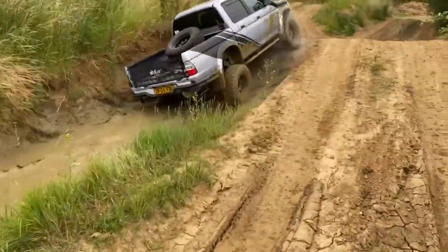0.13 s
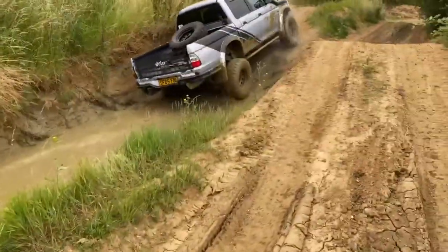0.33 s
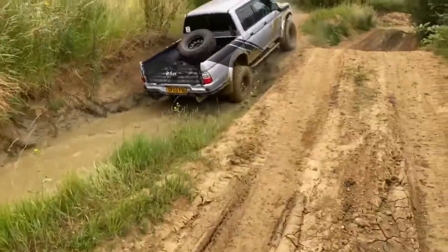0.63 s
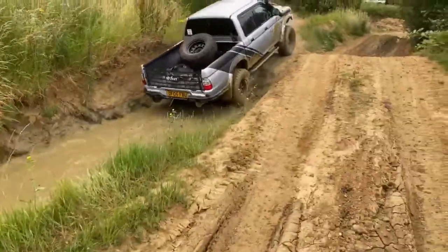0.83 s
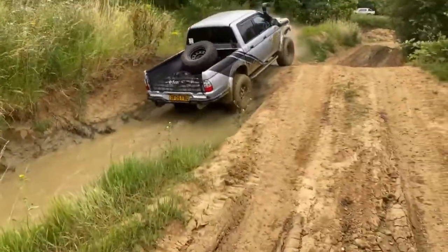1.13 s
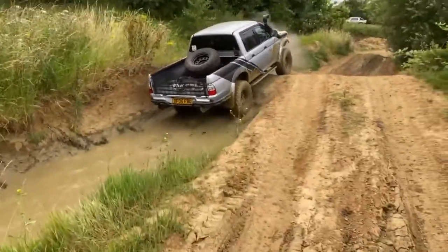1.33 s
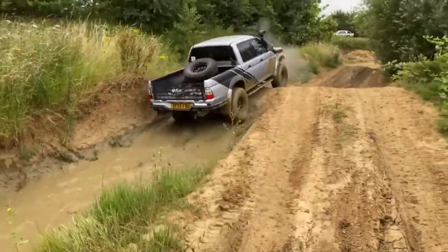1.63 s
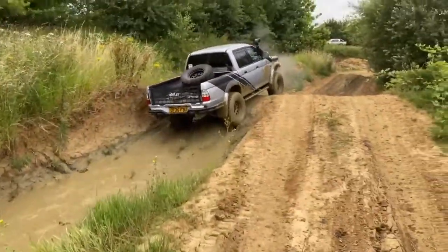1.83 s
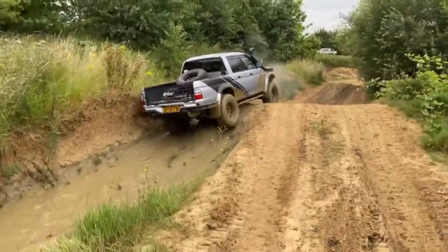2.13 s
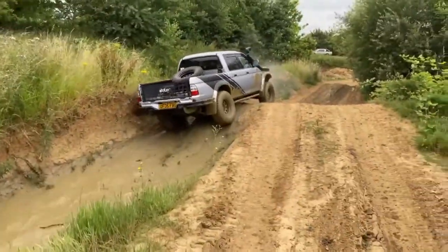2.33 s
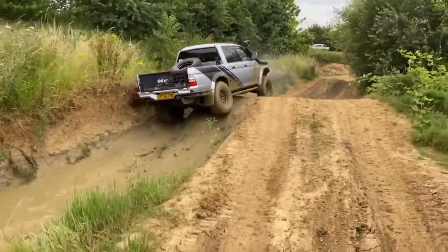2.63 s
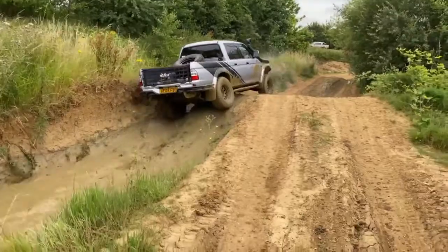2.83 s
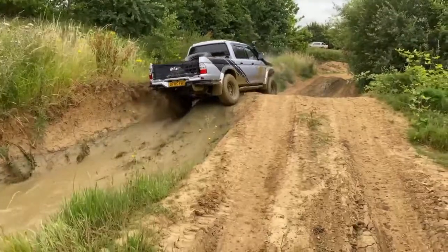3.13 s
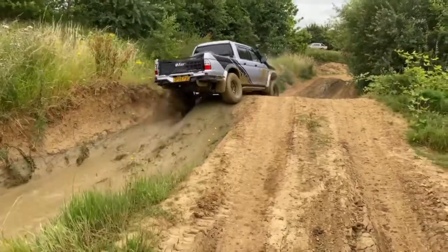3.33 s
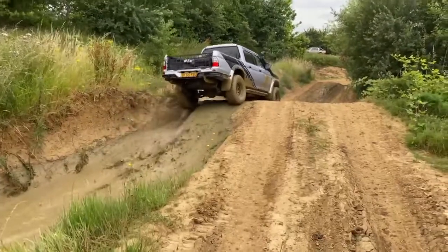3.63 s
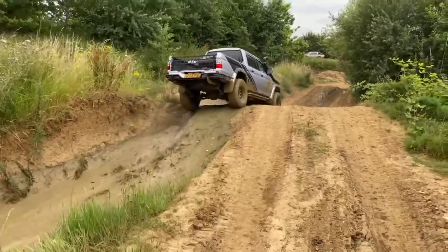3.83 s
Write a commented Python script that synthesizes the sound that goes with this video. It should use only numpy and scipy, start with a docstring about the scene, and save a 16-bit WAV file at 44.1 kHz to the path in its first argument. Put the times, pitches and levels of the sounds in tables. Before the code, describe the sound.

A hard-working truck engine growls and burbles while tyres hiss and slap through wet mud

```python
"""A hard-working eight-cylinder engine is heard first: a pickup truck claws its way out of a muddy ditch,
revving, bogging down and pulling again. Sines locked to the engine cycle give the firing hum and the burble
of the two uneven cylinder banks; firing impulses ring pipe resonances to give the exhaust bark.
Tyres hiss and slap through mud and water as bands and short bursts of noise, the engine bay whirrs in
resonated noise, and gusts buffet the microphone ports as low noise, rasp and sharp filtered impulses."""
import sys
import numpy as np
from scipy import signal
from scipy.fft import rfft, irfft
from scipy.io import wavfile
from scipy.ndimage import uniform_filter1d

SR = 44100
rng = np.random.default_rng(int(sys.argv[2]) if len(sys.argv) > 2 else 0)


def dump_mix(stems):
    """Bounce the given channels to the path in sys.argv[1] as a 16-bit WAV at rate SR."""
    frames = np.atleast_2d(stems).T  # one column per channel
    limited = np.clip(frames, -1, 1)  # hard clip at full scale
    pcm = np.round(limited * 32767).astype(np.int16)
    wavfile.write(sys.argv[1], SR, pcm)


N = 176400  # samples, 4 s


def amp(db):
    """Logarithmic level: 20 dB is a factor of ten in amplitude."""
    return 10 ** (np.asarray(db) / 20)


def rms_one(x):
    """Power normalisation: scale to unit rms."""
    return x / np.sqrt(np.mean(x ** 2) + 1e-20)


def evened(x):
    """Envelope division: divide by the running rms over a quarter second."""
    return x / np.sqrt(uniform_filter1d(x ** 2, size=SR // 4) + 1e-12)


def in_time(rows):
    """Linear interpolation in time: each column of a curve table, one value per sample."""
    seconds, *columns = np.transpose(rows)
    return [np.interp(np.arange(N) / SR, seconds, column) for column in columns]


def at_hz(points, hz):
    """Interpolation along log frequency: read a spectrum table."""
    table_hz, values = np.array(points).T
    return np.interp(np.log(hz), np.log(table_hz), values)


def drift(rate):
    """Low-passed chance: noise through two equal poles at rate (Hz) wanders slowly with unit rms."""
    step = 40  # samples between computed values
    r = np.exp(-2 * np.pi * rate * step / SR)
    chance = rng.standard_normal(N // step + 2002)
    slow = signal.lfilter([1], [1, -2 * r, r * r], chance)[2000:]  # drop the settling time
    return np.interp(np.arange(N) / step, np.arange(len(slow)), rms_one(slow))


def butter(x, hz, kind, order=2):
    """Maximally flat filtering: a Butterworth filter."""
    return signal.sosfilt(signal.butter(order, hz, kind, fs=SR, output="sos"), x)


def resonate(x, hz, width):
    """Damped resonance: a pole pair of a given width in Hz, gain 1 on top."""
    r = np.exp(-np.pi * width / SR)
    zeros = [(1 - r * r) / 2, 0, (r * r - 1) / 2]
    poles = [1, -2 * r * np.cos(2 * np.pi * hz / SR), r * r]
    return signal.lfilter(zeros, poles, x)


def stereo(mid, side, alike):
    """Interaural correlation: mix two independent noises to a given left-right likeness (-1 to 1)."""
    alike = np.clip(alike, -1, 1)
    opposed = side * np.array([[1], [-1]])
    return (np.sqrt(1 + alike) * mid + np.sqrt(1 - alike) * opposed) / np.sqrt(2)


def engine():
    """Periodic excitation: hum, bark and upper note all follow the cycle speed; a low rumble is added."""
    # Engine speed. Each row: time in seconds, four-stroke cycles per second.
    speed = [(0, 14.2), (.2, 14.25), (.42, 14.0), (.56, 15.6), (.68, 16.6), (.79, 16.1), (.9, 15.0),
             (1.0, 14.3), (1.1, 12.7), (1.2, 11.4), (1.4, 10.25), (1.6, 9.15), (1.72, 8.9), (1.95, 11.4),
             (2.2, 9.5), (2.42, 8.4), (2.5, 8.5), (2.6, 9.7), (2.7, 9.6), (2.8, 9.25), (2.92, 9.55),
             (3.0, 10.2), (3.1, 11.0), (3.22, 11.35), (3.4, 10.95), (3.6, 10.3), (3.8, 9.7), (4, 9.9)]
    # Engine load. Each row: time in seconds, then levels in dB of bank burble, firing hum, exhaust bark,
    # upper pipe note relative to the bark column, and low rumble.
    load = [(0.0, -31, -20, -27.5, -14, -35), (0.08, -17, -22, -28, -6.5, -33),
            (0.2, -35, -19, -34, -2, -57), (0.31, -26, -15, -32.5, -6, -53),
            (0.41, -24, -22, -26, -8.5, -47), (0.47, -23, -13.5, -24, -8.5, -51),
            (0.56, -24, -9.5, -18, -4, -49), (0.7, -34, -10.5, -17.5, -1.5, -53),
            (0.9, -25, -12, -22.5, 0.5, -36), (1.01, -28, -20, -28.5, 5, -37),
            (1.07, -24.5, -47, -35.5, 2.5, -22), (1.2, -19, -43, -33, -9, -29.5),
            (1.39, -17, -29, -32.5, -9, -33.5), (1.62, -21.5, -39, -34.5, -5, -17),
            (1.72, -27, -17.5, -25.5, -11, -35), (1.8, -32, -44, -34, -7.5, -31),
            (1.99, -26.5, -44, -50, -25, -26.5), (2.06, -42, -28, -37, 1, -49),
            (2.2, -42, -50, -39.5, -9, -24), (2.42, -43, -20, -31.5, 2, -43),
            (2.55, -22, -22, -19.5, -9, -29), (2.63, -15, -19.5, -22, -18, -35),
            (2.75, -24, -15.5, -21.5, -14.5, -11), (2.9, -21, -13, -23.5, -5, -30),
            (3.0, -13.5, -23, -21, -21, -29), (3.08, -11.5, -27, -24, -14, -34),
            (3.2, -16.5, -36, -33.5, -1, -19), (3.3, -21.5, -34, -34.5, -13, -31),
            (3.45, -17.5, -30, -30, -27, -55), (3.65, -16, -32, -28.5, -48, -36),
            (3.78, -29, -31, -35, -24, -23), (4.0, -34, -31, -33, -24, -24)]
    cycle_hz, = in_time(speed)
    burble_db, firing_db, bark_db, upper_db, rumble_db = in_time(load)
    turns = np.cumsum(cycle_hz) / SR  # cycles completed so far
    hum = cycle_hum(turns, cycle_hz, burble_db, firing_db, bark_db)
    bark = exhaust_bark(*firing_drive(turns), upper_db)
    return hum + amp(bark_db) * bark + amp(rumble_db) * low_rumble()


def cycle_hum(turns, cycle_hz, burble_db, firing_db, bark_db):
    """Harmonic synthesis: wavering sines at whole multiples of the cycle rate."""
    # Weaker partials. Each row: multiple of the cycle, level in dB relative to the bark before colouring.
    side_orders = [(3, -6), (7, -7), (10, -2), (11, -15), (13, -9.5), (16, -7.5), (17, -15.5), (18, -5.5),
                   (19, -9.5), (21, -11.5), (24, -10), (27, -9.5), (29, -12)]
    # Pipe colour on the weaker partials. Each row: frequency in Hz, gain in dB.
    pipe_colour = [(40, -0.5), (70, 1.5), (100, -9.5), (125, 2.5), (148, 1.5), (175, 3), (215, 0),
                   (265, -1.5), (320, -4), (400, -45)]
    hum = np.zeros(N)
    for order, db in [(5, burble_db), (8, firing_db)]:  # bank burble, one firing per cylinder
        level = np.sqrt(2) * amp(db + 1.2 * drift(23.0))
        hum += level * np.cos(2 * np.pi * order * turns)
    for order, db in side_orders:
        coloured_db = bark_db + db + at_hz(pipe_colour, order * cycle_hz)
        level = np.sqrt(2) * amp(coloured_db + 2.0 * drift(17.2))
        start = .3 * rng.random()  # turns; starting near step makes each cycle throb
        hum += level * np.cos(2 * np.pi * (order * turns + start))
    return hum


def firing_drive(turns):
    """Impulsive excitation: each firing is a knock followed by a decaying puff of noise."""
    # Cylinder strengths in firing order, one bank louder. Each entry: level in dB.
    cylinder_db = [7.5, -3.5, 4, 3.5, -6, 4, -3.5, -8]
    cylinders, roar_db = 8, -11.0
    scatter_db, jitter = 1.6, .03  # level scatter; timing scatter in firing intervals
    slots = np.arange(1, int(turns[-1] * cylinders))
    chance = rng.standard_normal((600, 2))[:len(slots)]
    firing_turns = (slots + jitter * chance[:, 0]) / cylinders
    at = np.interp(firing_turns, turns, np.arange(N)).astype(int)
    knocks = np.zeros(N)
    knocks[at] = amp(np.array(cylinder_db)[slots % cylinders] + scatter_db * chance[:, 1])
    puff_envelope = butter(knocks, 40.0, "low", order=1)
    puffs = rms_one(puff_envelope * rng.standard_normal(N))
    return rms_one(knocks) + amp(roar_db) * puffs, puffs


def exhaust_bark(drive, puffs, upper_db):
    """Source and filter: the firing drive rings parallel pipe resonances and an upper pipe note."""
    # Exhaust pipe resonances. Each row: frequency in Hz, half the width of each stage in Hz, gain in dB.
    pipe = [(175, 25.3, 15.5), (241.6, 12.5, 8), (275, 42, -3.5), (475, 32, -14), (833, 27, -18)]
    upper_hz, upper_width = 315, 45  # Hz
    bark = np.zeros(N)
    for k, (hz, half_width, db) in enumerate(pipe):
        ring = resonate(resonate(drive, hz, 2 * half_width), hz, 2 * half_width)
        bark += (-1) ** k * amp(db) * ring  # neighbours have opposite sign
    bark = butter(bark, 145, "high", order=4)
    upper = resonate(resonate(drive, upper_hz, 2 * upper_width), upper_hz, upper_width)
    upper = butter(upper, 365.0, "low", order=4)
    breathy = resonate(resonate(drive + .7 * puffs, 590.0, 110.0), 590.0, 110.0)
    upper += amp(-21.0) * breathy
    return amp(-3.0) * evened(bark) + amp(upper_db) * evened(upper)


def low_rumble():
    """Spectral shaping: white noise weighted in the frequency domain, kept between 22 and 400 Hz."""
    # Rumble spectrum. Each row: frequency in Hz, relative level in dB.
    rumble_spectrum = [(30, -31), (50, 0), (70, -6), (110, -5), (160, -11.5), (300, -56)]
    hz = np.maximum(np.arange(N // 2 + 1) * SR / N, 1)
    weight = amp(at_hz(rumble_spectrum, hz)) * (hz > 22) * (hz < 400)
    return rms_one(irfft(rfft(rng.standard_normal(N)) * weight, N))


def churn():
    """Subband noise: flickering fifth-octave bands of tyre hiss, carrying the engine bay's whirr."""
    # Tyres churning mud. Each row: time in seconds, hiss level in dB before a 0.5 dB lift,
    # treble level in dB, of which only the departure from its mean counts.
    churn_curve = [(0.0, -31, -10), (0.01, -31, -15), (0.21, -33, -15.5), (0.77, -33, -14),
                   (0.79, -34.5, -18), (1.86, -35.5, -19), (2.51, -38.5, -13), (2.53, -36.5, -6),
                   (2.67, -35, -14.5), (2.96, -35, -14), (2.99, -38.5, 3.5), (3.01, -35.5, -16.5),
                   (3.45, -36.5, -21), (3.5, -36.5, -12), (3.61, -36, -20.5), (4.0, -38, -16.5)]
    # Hiss spectrum. Each row: frequency in Hz, relative density in dB per Hz.
    hiss_spectrum = [(210, -21), (350, -37), (382, -8), (424, -6.5), (522, -8), (671, 2), (722, -3.5),
                     (929, -3), (1130, -4.5), (1490, -4), (1750, -10.5), (2060, -1.5), (2860, -12),
                     (3730, -8), (4520, -11.5), (5900, -15.5), (9470, -22.5), (10700, -69), (12000, -6.5),
                     (15600, -62), (22000, -120)]
    # Stereo likeness. Each row: frequency in Hz, left-right likeness.
    likeness = [(350, 1), (640, 0.43), (1150, 0.16), (2080, 0.24), (3760, -0.21), (6790, 0.2), (9300, -1.1),
                (10800, -0.5), (12000, 1)]
    # Stereo balance. Each row: frequency in Hz, left minus right in dB.
    balance = [(60, 0.0), (170, -14), (500, 6), (1460, -1.5), (4230, 3), (12300, -0.5)]
    hiss_db, treble_db = in_time(churn_curve)
    together = drift(7.0)  # wander shared by all bands
    edges = 300 * 2 ** np.arange(0, 5.5, 1 / 5)
    white = rng.standard_normal((2, 2, N))
    out = np.zeros((2, N))
    for k, (low, high) in enumerate(zip(edges, edges[1:])):
        mid, side = butter(white[k % 2], [low, high], "band")
        hz = np.sqrt(low * high)
        treble_share = np.clip(np.log2(hz / 4850.0), 0, 1)  # full from one octave above 4850 Hz
        top = treble_share * (treble_db - treble_db.mean())
        level = amp(at_hz(hiss_spectrum, hz) + top + 0.6 * together + 2.4 * drift(17.0))
        sides = amp(at_hz(balance, hz) * np.array([[.5], [-.5]]))
        out += level * stereo(mid, side, at_hz(likeness, hz)) * sides
    return amp(hiss_db + 0.5) * (rms_one(out) + whirr())


def whirr():
    """Resonance of noise: three narrow bands for the mechanical whirr of the engine bay."""
    # Whirr bands. Each row: centre in Hz, width of each stage in Hz, level in dB relative to the hiss
    # before the swell.
    bands = [(760, 70, -19.0), (1450, 160, -15.0), (2000, 160, -18.0)]
    # Swell shared by the bands. Each row: time in seconds, gain in dB.
    swell = [(0, 5.5), (.45, 2), (1.0, 5.5), (1.55, 1), (1.62, 12.5), (1.8, -0.5), (1.9, -18), (2.3, -0.5),
             (2.6, -35.5), (4, -26)]
    swell_db, = in_time(swell)
    out = np.zeros(N)
    for hz, width, db in bands:
        tone = rms_one(resonate(resonate(rng.standard_normal(N), hz, width), hz, width))
        out += amp(db + swell_db + 2 * drift(5.4)) * tone
    return out


def splashes():
    """Transient noise: each mud or water slap is a grainy band-passed burst with soft edges."""
    # Slaps. Each row: time of the peak in seconds, level in dB, decay to 1/e in seconds, centre in Hz.
    slaps = [(0.611, -40, 0.11, 3000), (1.593, -36.5, 0.05, 2360), (1.598, -42.5, 0.1, 4960),
             (2.012, -42, 0.065, 2100), (2.1, -38, 0.057, 1850), (2.11, -40, 0.014, 4100),
             (2.205, -41, 0.024, 2190), (2.235, -38, 0.02, 1970), (2.315, -32.5, 0.022, 1850),
             (2.538, -62, 0.061, 11100), (2.986, -50, 0.045, 11000), (3.137, -34.5, 0.029, 1540),
             (3.191, -34.5, 0.049, 1300)]
    span = 1.45  # band edge to centre, frequency ratio
    out, t = np.zeros((2, N)), np.arange(N) / SR
    for peak_s, db, length, hz in slaps:
        a, b = int((peak_s - .1) * SR), int((peak_s + .3) * SR)
        u = (t[a:b] - peak_s) / length
        shape = np.where(u < 0, np.exp(-(u / .4) ** 2), np.exp(-u ** 2))  # rises faster than it falls
        grain_gain = amp(1.6 * rng.standard_normal((2, b - a)))
        grains = rng.standard_normal((2, b - a)) * grain_gain
        mid, side = rms_one(butter(grains, [hz / span, min(hz * span, .45 * SR)], "band"))
        out[:, a:b] += amp(db) * shape * stereo(mid, side, .7)
    return out


def wind():
    """Turbulence noise: lumpy low noise, partly its own in each port, turning raspy in strong gusts."""
    # Wind at the microphone ports. Each row: time in seconds, gust strength in dB before the layer offsets.
    gusts = [(0, -68), (.76, -80), (.81, -32), (.88, -46), (1.0, -39.5), (1.3, -36), (1.4, -25.5),
             (1.6, -27), (1.68, -64), (1.77, -19.5), (1.95, -29), (2.15, -22.5), (2.23, -16.5), (2.28, -13),
             (2.42, -12.5), (2.5, -22), (2.75, -27.5), (2.92, -37.5), (3.0, -19), (3.15, -23.5), (3.3, -35),
             (3.47, -56), (3.54, -38), (3.62, -42), (3.75, -21), (4, -31)]
    gust_db, = in_time(gusts)
    alike = -.25  # left-right likeness
    noise = rng.standard_normal((4, N))
    low = butter(butter(noise[:2], 130, "low", order=1), 197.0, "low")
    low = rms_one(butter(low, 46.0, "high"))
    rasp = rms_one(butter(noise[2:], [250.0, 650.0], "band"))
    lump_db = gust_db - 2.0 + 1.8 * (drift(26.0) + drift(8.6))
    # the rasp grows 1.8 dB for each dB of gust
    rasp_db = gust_db + .8 * (gust_db - gust_db.max()) - 17.0 + 5.0 * drift(40.0)
    return amp(lump_db) * stereo(*low, alike) + amp(rasp_db) * stereo(*rasp, alike) + buffets()


def buffets():
    """Impulse response: sharp puffs, mostly on one port, are negative clicks through a band filter."""
    # Puffs. Each row: time in seconds, nominal peak in dB before panning, left minus right in dB.
    puff_rows = [(1.763, -16.0, 18.0), (2.083, -25.0, 18.0), (2.171, -20.0, 18.0), (2.2, -23.0, -18.0),
                 (2.217, -17.0, 18.0), (2.228, -14.0, -18.0), (2.238, -21.0, 18.0), (2.309, -18.0, -18.0),
                 (2.327, -13.0, 18.0), (2.352, -21.0, -18.0), (2.373, -15.0, 18.0), (2.397, -14.0, 18.0),
                 (2.431, -14.0, 18.0), (2.455, -13.0, 18.0), (2.47, -19.0, -18.0), (2.98, -22.0, 18.0)]
    puff_hz = 306
    clicks = np.zeros((2, N))
    for start, db, pan_db in puff_rows:
        clicks[:, int(start * SR)] = -amp(db + np.array([pan_db, -pan_db]) / 2)
    puff = butter(clicks + 1e-18, [puff_hz / 2, puff_hz * 1.7], "band", order=1)
    puff = butter(puff, 620.0, "low", order=4)
    return puff * SR / (4 * puff_hz)  # offsets the loss of height in filtering a single sample


def scene():
    """Superposition: the engine sits in the centre; hiss, slaps and wind spread round it."""
    return engine() + churn() + splashes() + wind()


def record(dry):
    """Band limiting and soft saturation: roll off deep bass, round the peaks, cut the top steeply."""
    dry = butter(dry, 50.7, "high")
    rounded = 1.3 * np.tanh(dry / 1.3)
    # 70 dB down from 12250 Hz upward
    steep_cut = signal.cheby2(14, 70, 12250, fs=SR, output="sos")
    return signal.sosfilt(steep_cut, rounded)


dry = scene()
out = record(dry)
dump_mix(out)
```